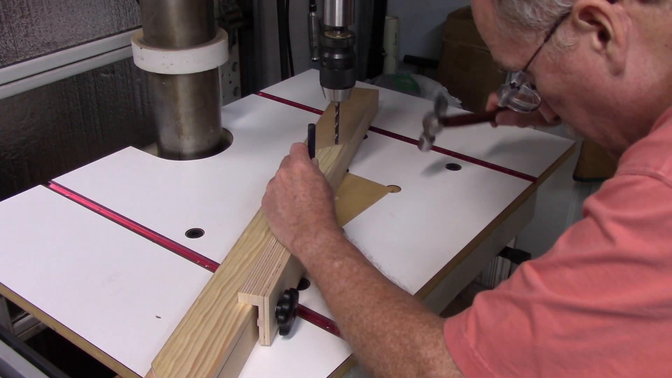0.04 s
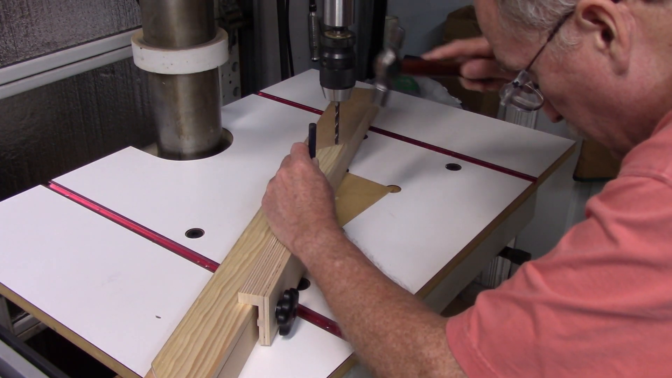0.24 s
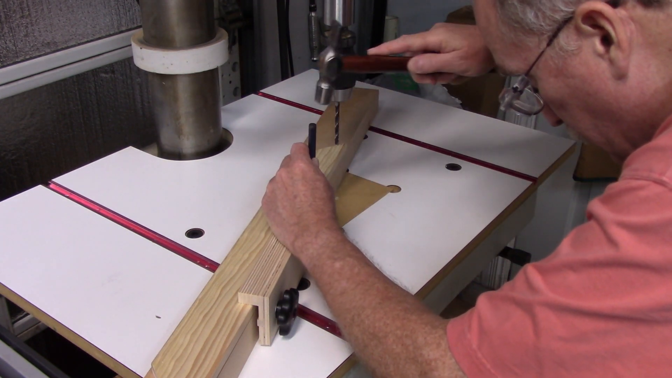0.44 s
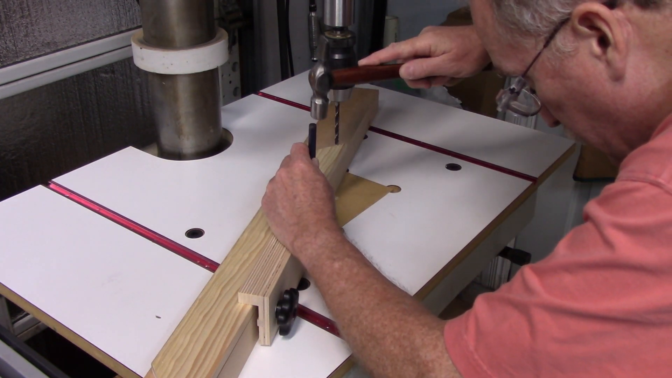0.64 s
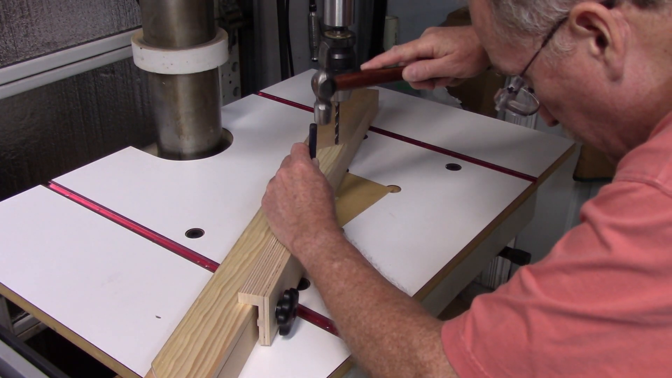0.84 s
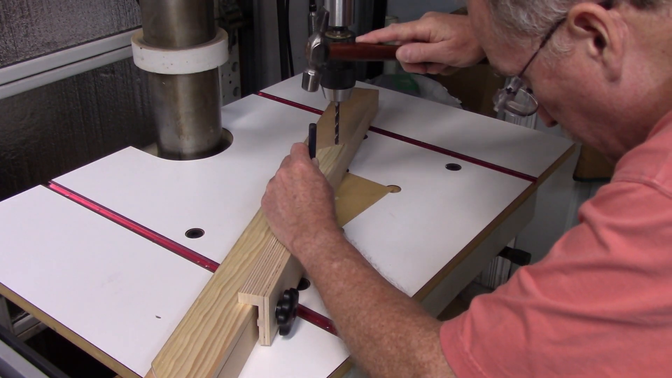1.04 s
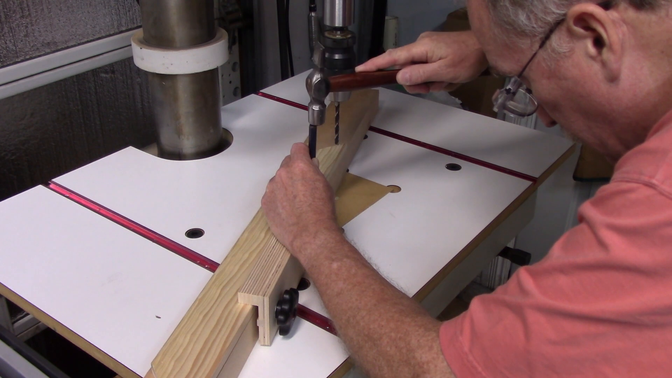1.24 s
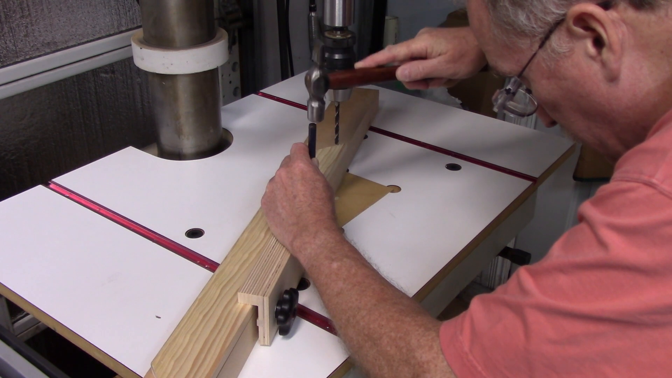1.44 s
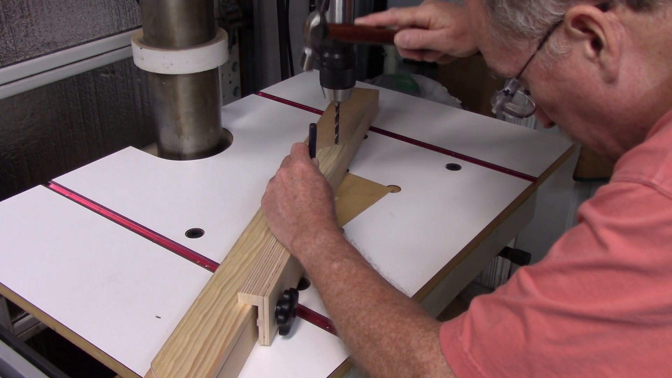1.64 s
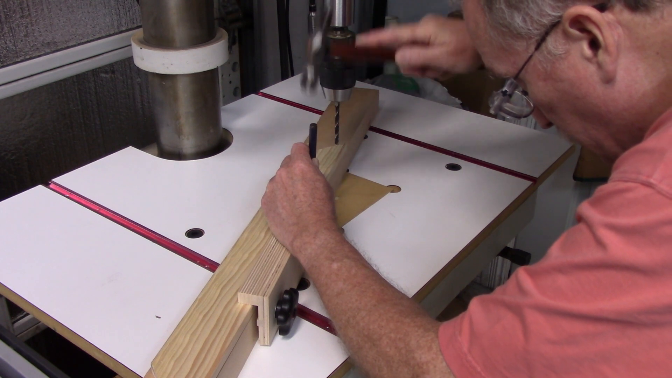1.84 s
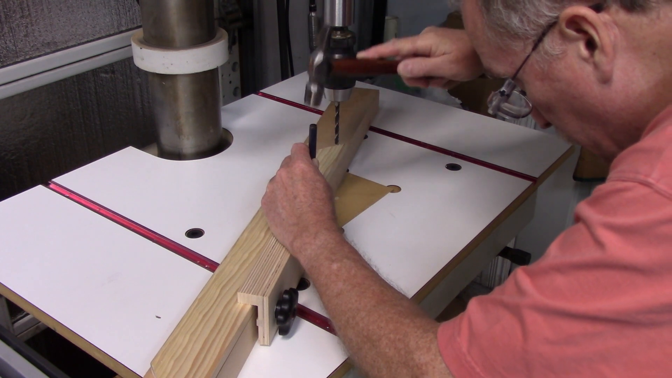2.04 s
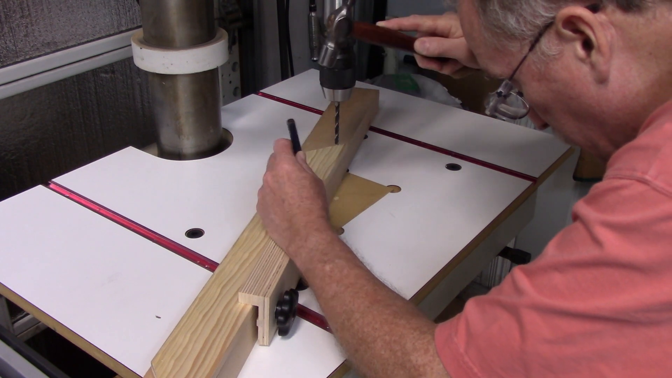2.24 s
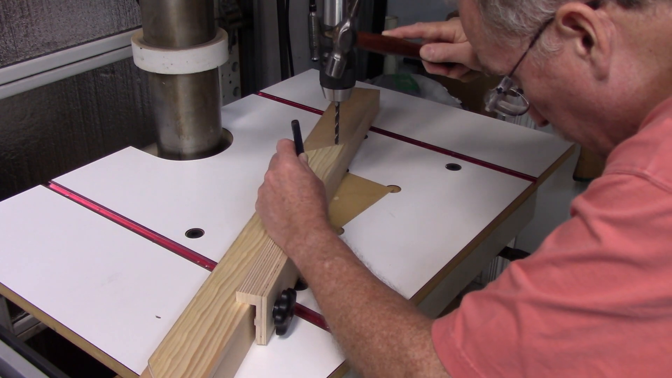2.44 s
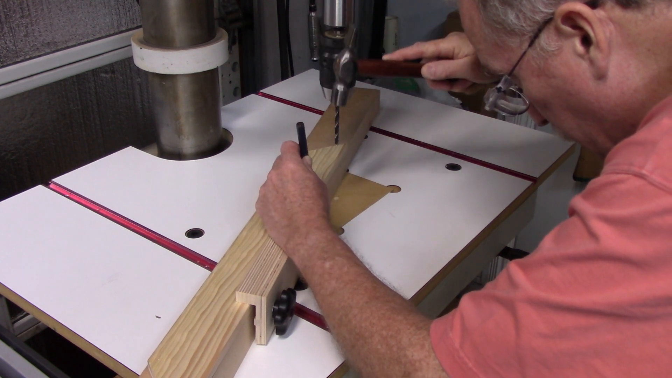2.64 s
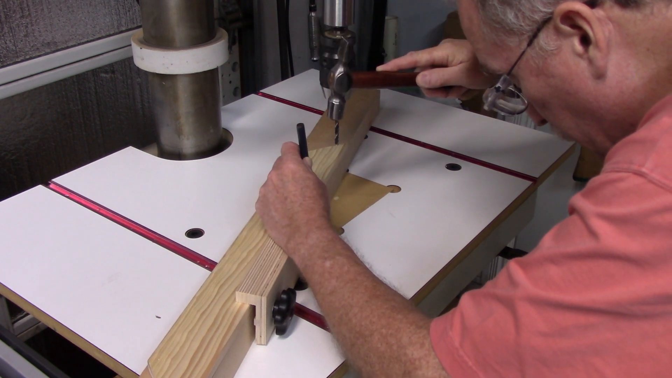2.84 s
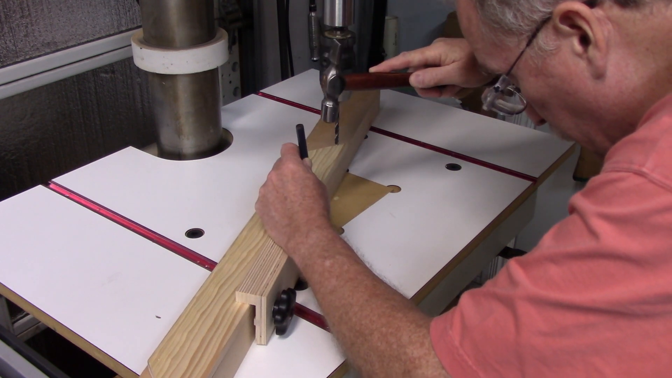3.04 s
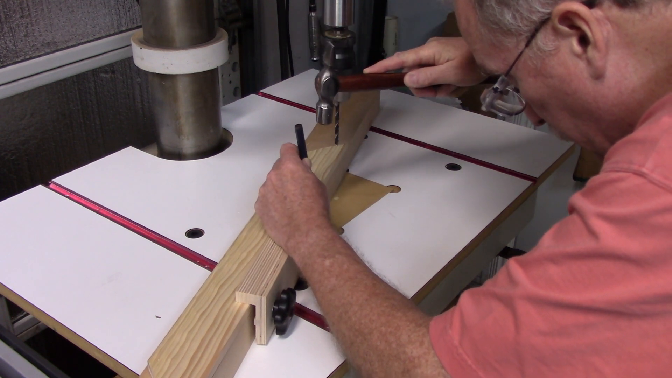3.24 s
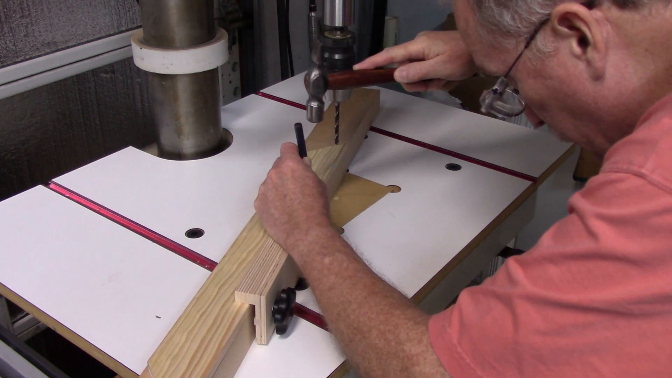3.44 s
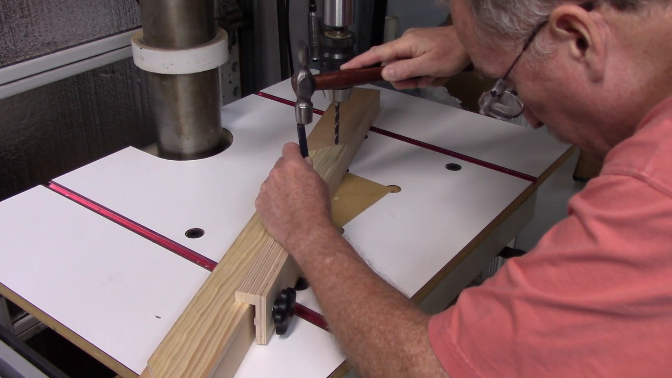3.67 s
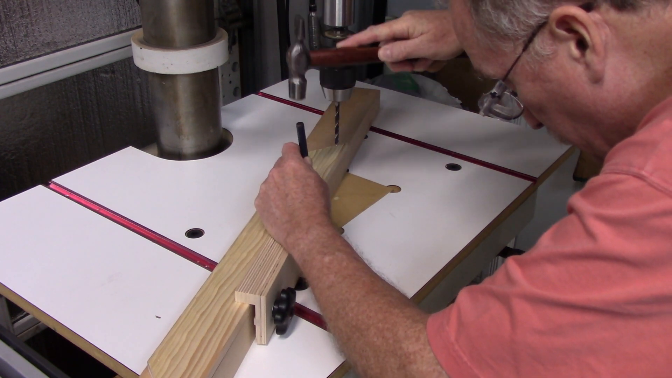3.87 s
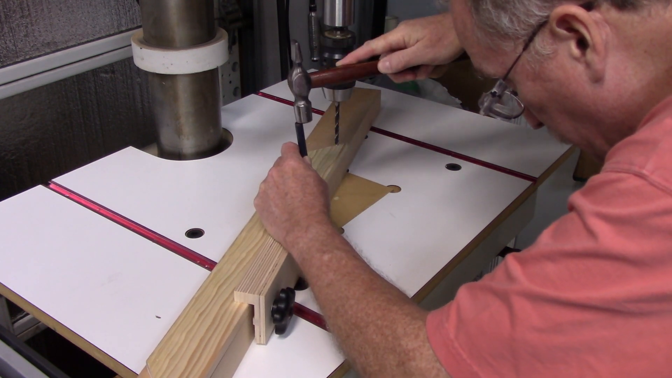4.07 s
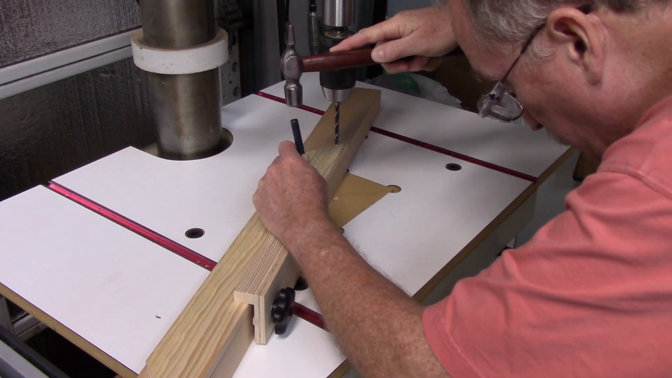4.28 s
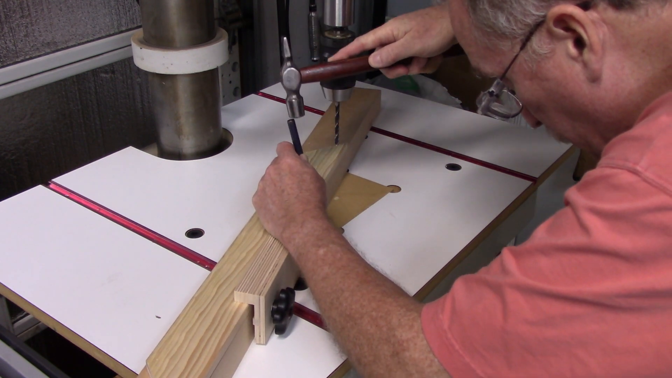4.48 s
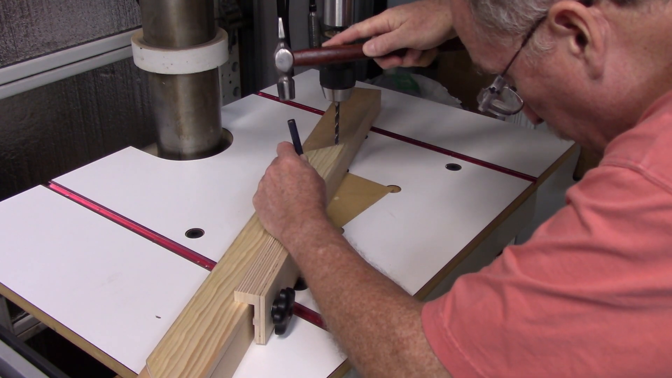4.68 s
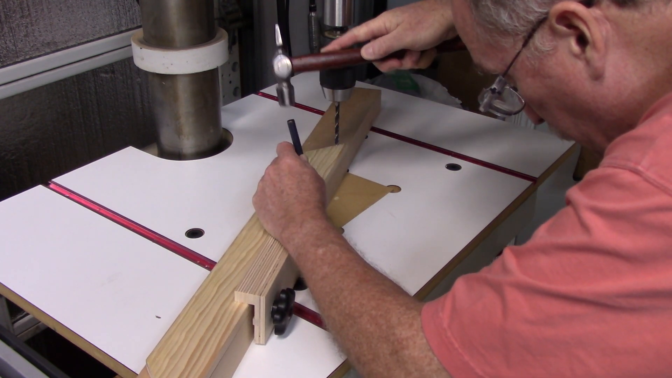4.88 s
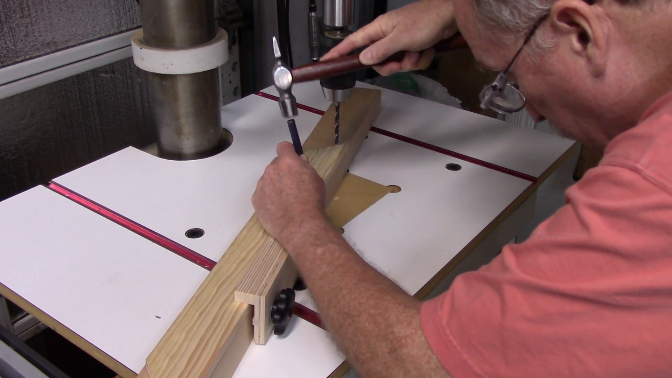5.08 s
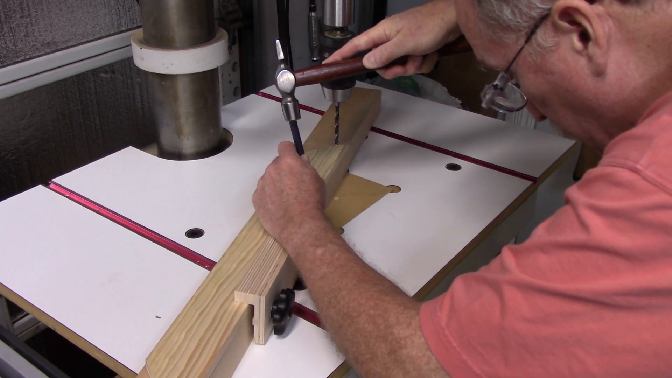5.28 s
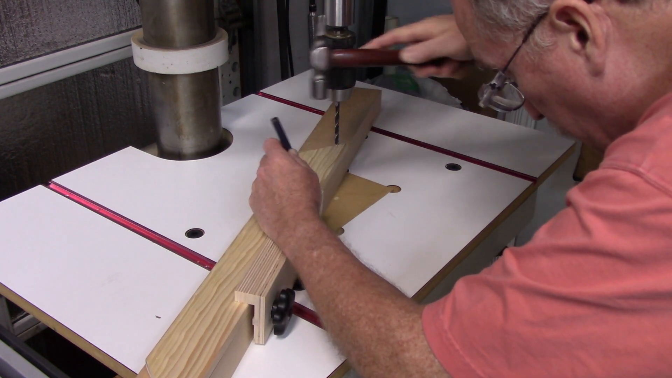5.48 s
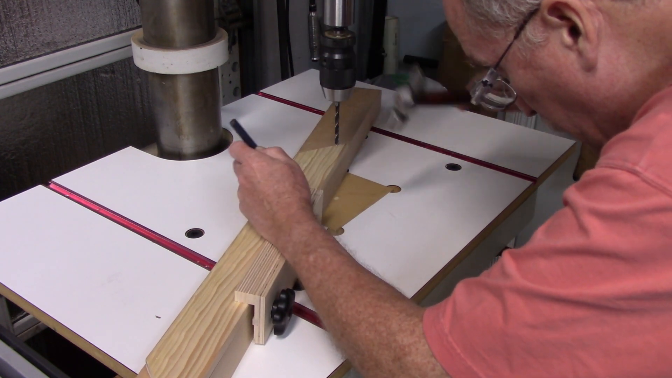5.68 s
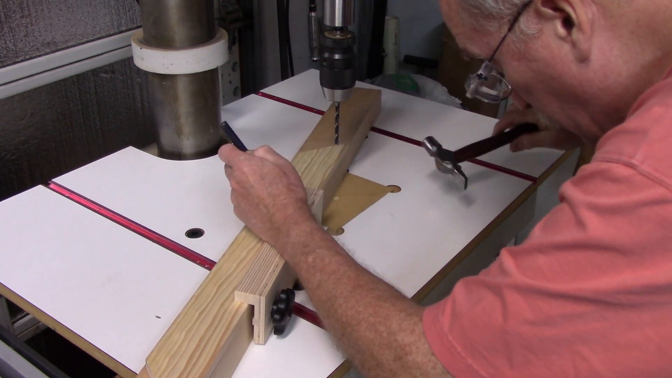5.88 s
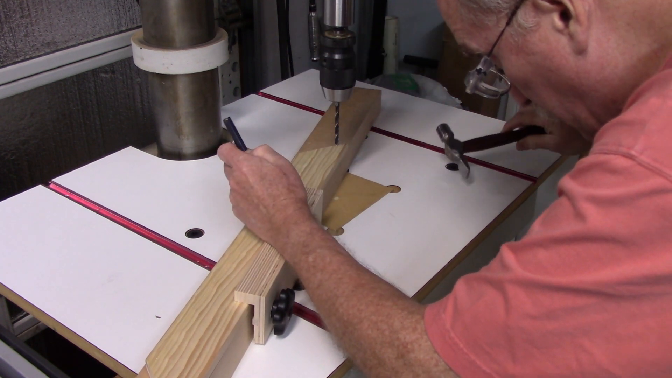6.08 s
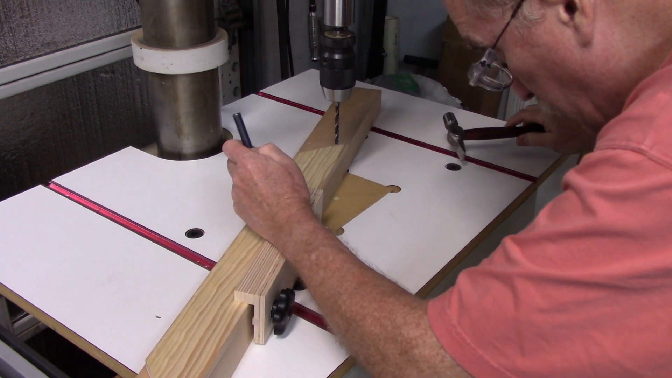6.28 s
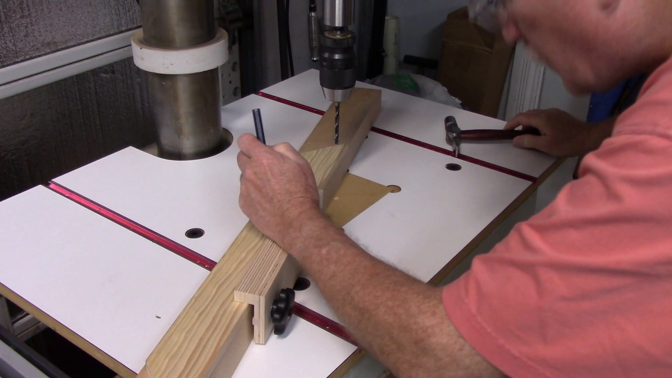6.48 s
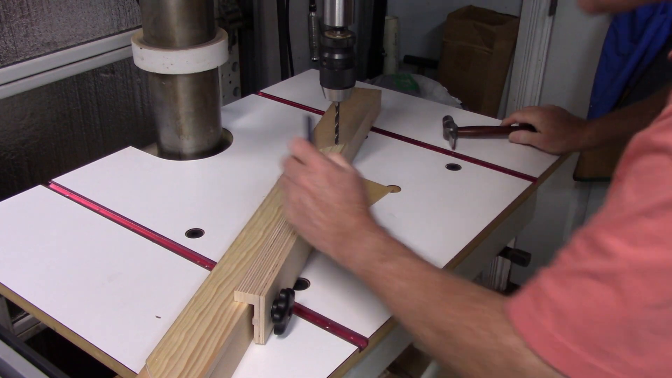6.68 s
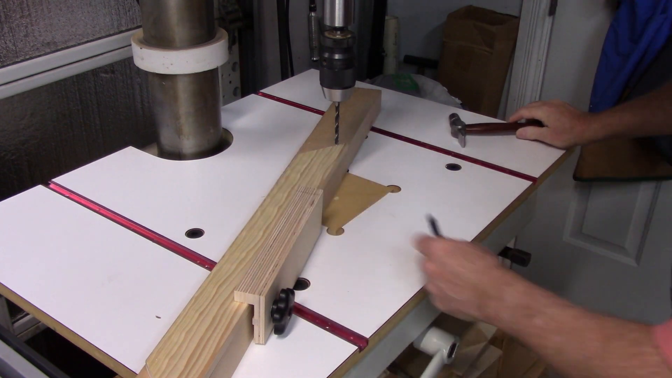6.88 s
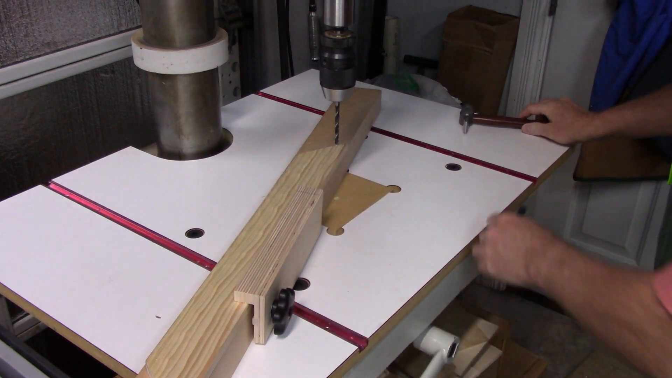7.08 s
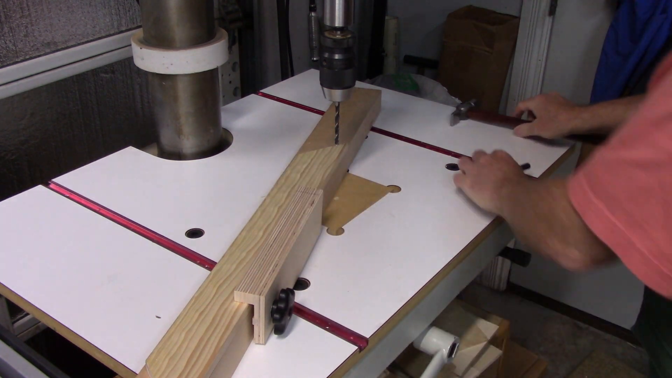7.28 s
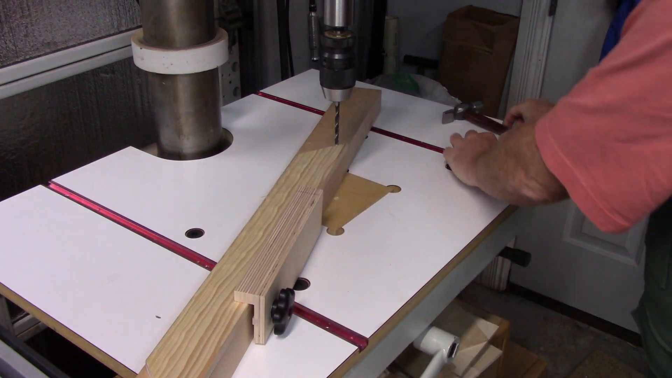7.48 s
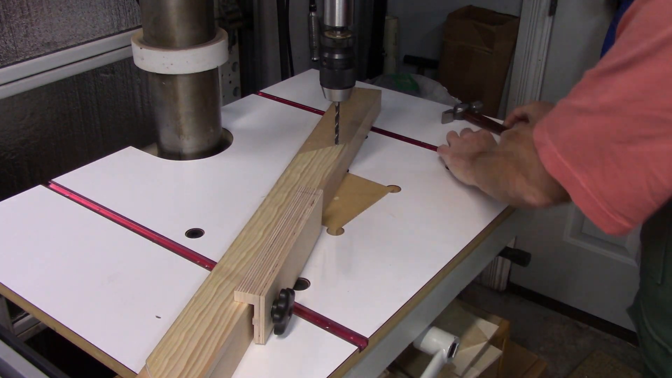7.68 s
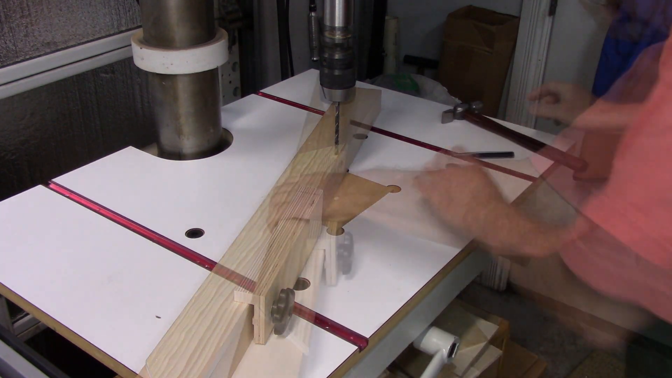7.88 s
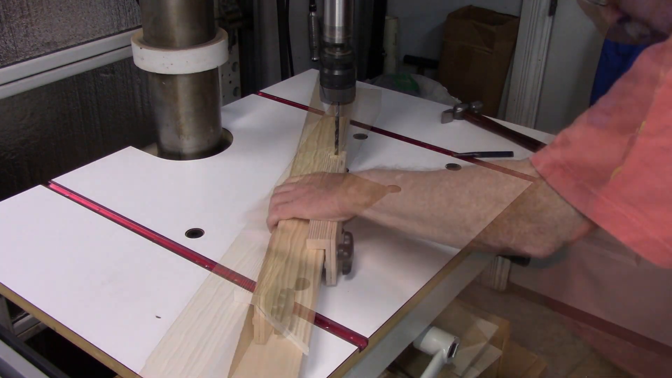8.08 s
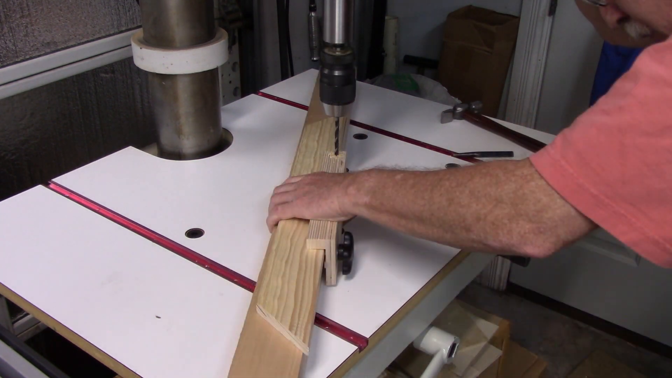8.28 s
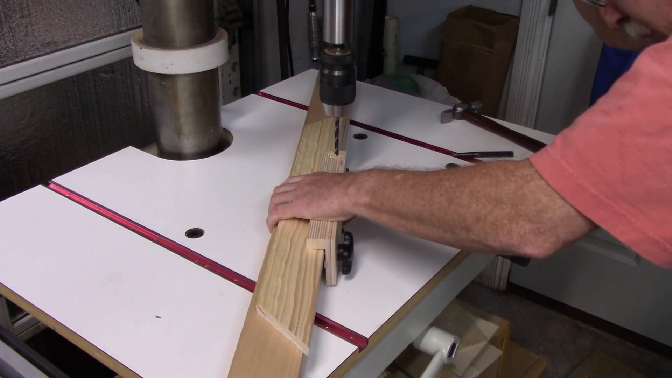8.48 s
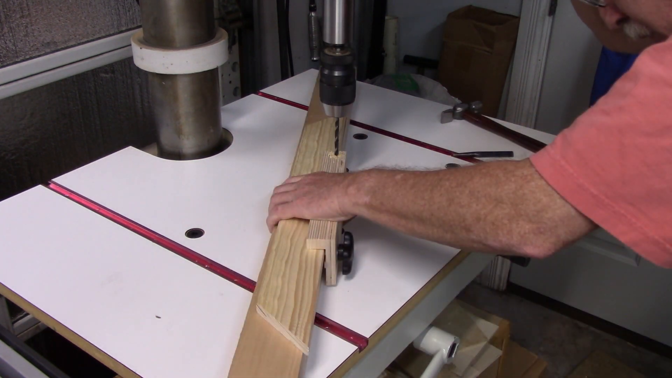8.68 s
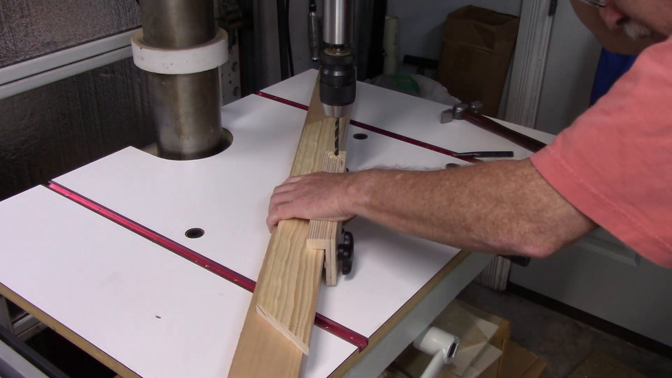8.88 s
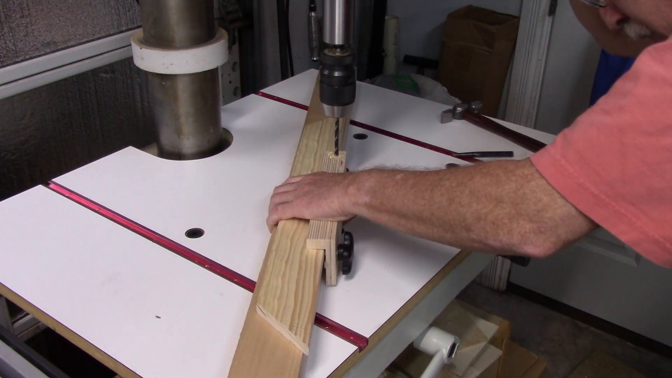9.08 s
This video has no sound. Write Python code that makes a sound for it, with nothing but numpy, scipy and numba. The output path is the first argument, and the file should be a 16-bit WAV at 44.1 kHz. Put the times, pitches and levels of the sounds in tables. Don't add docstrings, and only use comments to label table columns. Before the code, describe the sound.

A live workshop heard by a camera microphone, with quiet room air and a thin, high drive hiss and whine throughout. The faint echo of an earlier knock dies away at the start. A small hammer hits a steel punch on wood: weak and ringing at 0.8 s, medium at 1.3, strong at 2.0. After a pause come blows at 3.7, 4.1, a light one at 4.5, then 4.8, 5.1 and the hardest at 5.3, each a sharp crack with a roomy tail, briefly ducked. From 6.5 to 6.8 s tools knock and rock rapidly on a table top; soft thuds and a short drag follow around 7.1-7.4. From 7.7 the drill press fades in: irregular clacks until 7.9, a brief high squeal, then by 8.3 a full mid-low hum with bearing whine, surging near 8.5 and 9.0, with a late knock at 9.1, running to the end.

```python
import sys
import numpy as np
from scipy import signal
from scipy.fft import rfft, irfft, next_fast_len
from scipy.io import wavfile
from scipy.ndimage import map_coordinates
from numba import njit

SR = 44100
rng = np.random.default_rng(int(sys.argv[2]) if len(sys.argv) > 2 else 0)


def how_loud(loudness_db):
    steps = np.asarray(loudness_db, float) / 20
    return 10 ** steps


def waveform_to_disk(signal):
    frames = np.transpose(np.atleast_2d(signal))
    scaled = np.clip(frames, -1, 1) * 32767
    samples = np.round(scaled).astype(np.int16)
    wavfile.write(sys.argv[1], SR, samples)


N = 402191
T = np.arange(N) / SR

# start_s, blow_db, fence_bending_db, punch_ring_db, hammer_ring_db
TAPS = [
    (0.7864, -18, 9.5, 12.5, -15),
    (1.268, 0, -6.5, -1.5, -2.5),
    (1.9535, 12, -2.5, -0.5, -23),
    (3.705, -0.5, -4, -4.5, -3),
    (4.113, 9.5, -3.5, -7, -9),
    (4.457, -6, 4, -1, -33),
    (4.808, 9, -1, -4.5, -35),
    (5.063, 12, 1, -7, -9),
    (5.272, 15.5, -2, -11, -28),
]
REBOUNDS = [
    (.797, -35, 3, 0, -30),
    (1.291, -10.5, 1.5, -15, -30),
]
# lower_hz, upper_hz, width_hz
SEAT_TONES = [(2380, 5400, 170), (2930, 3520, 140), (1500, 5000, 300), (1190, 3440, 140), (2950, 5230, 220),
              (2920, 6250, 260), (2280, 2970, 300), (2980, 5450, 220), (3050, 5900, 450)]
# lower_db, upper_db
SEAT_LEVELS = [(8.5, 1), (-14, -1), (-9, -2.5), (-3.5, 1), (-11, -9), (3, -16), (-29, -6), (-3, -8),
               (-3.5, -12)]
# pitch_hz, width_hz, level_db
FENCE_BENDING = [(401, 390, -8.5), (763, 680, -6.5), (1068, 297, -2), (1444, 430, -2.5)]
# pitch_hz, width_hz, level_db
FENCE_EDGE = [(1874, 257, 4), (2308, 200, 1.5)]
# pitch_hz, width_hz, level_db
FENCE_KNOCK = [(2842, 177, 2), (3500, 710, -0.5), (4285, 660, -8.5), (8050, 800, -6), (9200, 2500, -14)]
# pitch_hz, width_hz, level_db
PUNCH_RING = [(4940, 150, -1.5), (5256, 240, -3.5), (5540, 370, -6), (6220, 200, -4.5), (7100, 200, -12)]
# pitch_hz, width_hz, level_db
PUNCH_BENDING = [(1400, 90, 1), (4190, 200, -6), (4930, 90, -4), (6255, 90, -6), (8550, 80, -11),
                 (11150, 250, -11)]
# pitch_hz, width_hz, level_db
HAMMER_RING = [(10100, 200, -24), (13017, 9, 3), (13790, 42, -22)]
PUNCH_BENDING_DB, FENCE_EDGE_DB = -4, -2
PUNCH_CHATTER_S = 0.03
NEAR_HZ = 756

# start_s, blow_db, hardness_khz, thud_db
KNOCKS = [(6.485, -6, 1.8, -9.5), (6.54, 2, 5, -15), (6.737, 0.5, 0.57, -3), (6.748, -11, .74, 4),
          (6.774, -34, 0.9, 2), (6.786, -5.5, 0.84, -1.5), (6.804, -12.5, 0.8, -13), (7.128, -13, 1.2, 3),
          (7.153, -18.5, .65, 10.5), (7.25, -22.5, 0.4, 11.5), (7.43, -16, 0.46, 4), (7.617, -34, 1, 15)]
# blow_db, hardness_khz, thud_db
EARLIER_KNOCK = (-2.7, 2.5, -2.5)
EARLIER_BY_S = 1 / 12
# pitch_hz, width_hz, level_db
TABLE_KNOCK = [(1062, 41, 7), (1373, 71, 3.5), (1532, 42, 5.5), (1650, 104, 4.5), (1914, 290, 2.5),
               (2790, 720, -0.5), (3820, 800, 1.5), (5650, 3800, 2), (7800, 7500, -1.5)]
# pitch_hz, width_hz, level_db
TABLE_THUD = [(369, 54, -2.5), (566.6, 38, 8), (703, 65, 8), (900, 97, 6.5)]
ROCK_S, ROCK_GAP_S = 6.568, 0.0222
ROCK_DB, ROCK_LOSS_DB = -8, 1.5
ROCK_HARDNESS_KHZ, ROCK_THUD_DB = 1.2, -3
CONTACT_S, CONTACT_GROWS, SHORTEST_S = 0.058, 0.36, 0.022
TABLE_ROOM_DB = -6
# attack_s, hold_s, release_s
DRAG = (.015, .175, .09)
# start_s, attack_s, hold_s, release_s
BRUSH = (6.82, .2, .25, .15)
DRAG_S, DRAG_DB, BRUSH_DB = 7.082, -25.5, -41.5

# start_s, blow_db, low_db
RATTLE = [
    (7.6871, -11, 5),
    (7.712, -14, 8),
    (7.7219, -18, 18),
    (7.7567, -10.5, 7.5),
    (7.8047, -6.5, 0.5),
    (7.8493, -10, 4),
    (7.888, -12, 4.5),
    (7.911, -12.5, 5),
    (8.03, -18, 11),
    (9.097, -16, 5),
]
# pitch_hz, width_hz, level_db
GUARD_LOW = [(695, 176, -9), (1050, 106, -2.5), (1704, 170, 1.5)]
# pitch_hz, width_hz, level_db
GUARD = [(3090, 550, 5), (3650, 480, 4), (5800, 690, -5), (6800, 420, -12)]
# attack_s, hold_s, release_s
SQUEAL = (.03, .12, .04)
# pitch_hz, level_db
BELT = [(4760, -0.5), (10950, -5)]
SQUEAL_S, SQUEAL_DB = 7.69, -36
# pitch_hz, width_hz, level_db
CASTING = [(244.2, 13.3, -8.5), (295, 20, -9), (353.4, 13.4, -0.5), (443.7, 14.5, -1), (527, 8.4, 3),
           (615, 29, -4), (689, 43, -9.5), (824, 56, -12)]
# pitch_hz, width_hz, level_db
COVER = [(990, 550, -13.5), (1252, 42, -6), (1390, 99, -11), (1567, 12, -4.5), (1623, 14, -6.5),
         (1857, 79, -9.5), (2040, 160, -16.5)]
# pitch_hz, width_hz, level_db
BEARING = [(2215, 98, -9.5), (2426, 31, 1), (2549, 52, -1), (2880, 170, -14), (3180, 41, -6),
           (3600, 400, -26), (4130, 85, -19), (4580, 140, -34), (6200, 1200, -24)]
CASTING_DB, COVER_DB, BEARING_DB = -12.5, -18, -19.5
COVER_EARLY, BEARING_EARLY = 1, 0.93
# middle_s, level_db
SHUDDERS = [
    (8.25, 1),
    (8.515, 5.5),
    (8.62, 0),
    (8.85, 2),
    (9.015, 5),
    (9.11, 3.5),
]
SHUDDER_S = 0.028
# pitch_hz, level_db (per Hz)
RUMBLE = [(25, -18), (60, -15.5), (200, -5.5), (300, -19)]
FADE_S, FADE_LENGTH_S = 7.67, 0.64

# pitch_hz, level_db (per Hz)
DRIVE = [(2940, -55), (5000, -28), (5950, -3.5), (7160, -10), (7510, -5), (8040, -2.5), (8280, 5),
         (8600, -1.5), (9480, -2.5), (10300, -5), (11100, -10), (12000, -5), (13300, -13), (14400, -2.5),
         (15900, -16)]
# pitch_hz, level_db (rms)
WHINE = [(963.6, -60), (3661, -68), (6132, -58), (6783, -61), (7564, -59), (7854, -57), (8043, -57),
         (8161, -55), (8280, -50), (8403, -55), (8581, -55), (8764, -56), (8882, -53), (8942, -51),
         (9060, -55), (9679, -58), (9895, -58), (11617, -63), (12516, -65), (12715, -64), (13264, -66),
         (13921, -67)]
# pitch_hz, level_db (per Hz)
AIR = [(15, -58), (25, -29), (209, -12.5), (228, -5), (267, -6.5), (466, -2.5), (521, -4), (596, -4.5),
       (871, -7), (996, -1.5), (1090, -9), (2430, -14), (5200, -13.5), (6760, -39), (11400, -120)]
DRIVE_DB, AIR_DB, FRAME_HZ = -30, -42.5, 60
# pitch_hz, decay_s
SHOP = [(200, 0.72), (1000, 0.8), (3000, 0.65), (6000, 0.76), (12000, 0.12)]
# pitch_hz, level_db
MIC = [(30, -3.5), (120, -11), (215, -7.5), (240, -2.5), (7000, -1), (12000, -4.5), (15700, -11),
       (16000, -41)]


def taps():
    out = np.zeros(N)
    rows = zip(TAPS + REBOUNDS, 2 * SEAT_TONES, 2 * SEAT_LEVELS)
    for (start, db, low_db, punch_db, head_db), (lower, upper, width), (lower_db, upper_db) in rows:
        wood = struck(FENCE_KNOCK, t60=0.028, hardness=7.8)
        wood += how_loud(low_db) * struck(FENCE_BENDING, t60=0.03, hardness=8.9)
        wood += how_loud(low_db + FENCE_EDGE_DB) * struck(FENCE_EDGE, t60=0.011, hardness=4.4)
        steel = how_loud(head_db - 3.5) * struck(HAMMER_RING, t60=0.004, hardness=19.0)
        steel -= how_loud(punch_db - 2.0) * struck(PUNCH_RING, t60=PUNCH_CHATTER_S, hardness=14)
        steel += how_loud(punch_db + PUNCH_BENDING_DB) * struck(PUNCH_BENDING, t60=0.004, hardness=4.7)
        seat = how_loud(lower_db) * struck([(lower, width, 0)], t60=0.0068, hardness=11.2)
        seat += how_loud(upper_db) * struck([(upper, width, 0)], t60=0.0068, hardness=11.2)
        direct, spread = how_loud(db) * (wood + steel + seat)
        direct = filtered(direct, lambda hz: (1j * hz / (1j * hz + NEAR_HZ)) ** 2)
        add(out, start, np.array([direct, spread]), room_db=-4.0)
    return out


def table():
    out = np.zeros(N)
    rocks = [(ROCK_S + k * ROCK_GAP_S, ROCK_DB - k * ROCK_LOSS_DB, ROCK_HARDNESS_KHZ, ROCK_THUD_DB)
             for k in range(6)]
    for start, db, hardness, thud_db in [(-EARLIER_BY_S, *EARLIER_KNOCK), *KNOCKS, *rocks]:
        contact = max(CONTACT_S * how_loud(CONTACT_GROWS * db), SHORTEST_S)
        blow = struck(TABLE_KNOCK, contact, hardness)
        blow -= how_loud(thud_db) * struck(TABLE_THUD, contact, hardness)
        add(out, start, how_loud(db + 1.0) * blow, TABLE_ROOM_DB)
    drag_body = [(hz, width, db - hz / 110) for hz, width, db in TABLE_THUD + TABLE_KNOCK]
    out += gains(DRAG_S, *DRAG, DRAG_DB) * shaken(drag_body, lumps_db=-1.0, rate=50)
    out += gains(*BRUSH, BRUSH_DB) * shaken(TABLE_KNOCK[:7], lumps_db=0.0, rate=15)
    return out


def drill():
    return drill_hum() + guard_rattle() + belt_squeal()


def drill_hum():
    share = fade()
    surge_db = sum(db * np.exp(-0.5 * ((T - middle) / SHUDDER_S) ** 2) for middle, db in SHUDDERS)
    casting = how_loud(CASTING_DB + surge_db) * share
    cover = how_loud(COVER_DB) * share ** COVER_EARLY
    bearing = how_loud(BEARING_DB) * share ** BEARING_EARLY
    out = casting * shaken(CASTING, lumps_db=2.5, rate=45)
    out += cover * shaken(COVER, lumps_db=0.0, rate=44)
    out += bearing * shaken(BEARING, lumps_db=1.0, rate=70)
    out += how_loud(-12.5) * casting * noise(RUMBLE)
    return filtered(out, lambda hz: 1 / (1 + (hz / 7000) ** 4))


def guard_rattle():
    out = np.zeros(N)
    for start, db, low_db in RATTLE:
        blow = struck(GUARD, t60=0.066, hardness=28)
        blow += how_loud(low_db) * struck(GUARD_LOW, t60=0.072, hardness=2.8)
        add(out, start, how_loud(db - 5.0) * blow, room_db=-9)
    return out


def belt_squeal():
    squeal = np.zeros(N)
    for hz, db in BELT:
        squeal += how_loud(db + 1.5 * wobble(60)) * np.sin(2 * np.pi * hz * T + 0.43 * wobble(80))
    return gains(SQUEAL_S, *SQUEAL, SQUEAL_DB) * squeal


def camera():
    throb = 1 + 0.1 * np.sin(2 * np.pi * 2 * FRAME_HZ * T) + 0.043 * np.sin(2 * np.pi * FRAME_HZ * T)
    out = how_loud(DRIVE_DB - 1.02 + 1.3 * wobble(3.63)) * throb * noise(DRIVE)
    for hz, db in WHINE:
        out += how_loud(db + 5 + 2.5 * wobble(8)) * np.sin(2 * np.pi * hz * T + 0.7 * wobble(12))
    return out


def room_air():
    return how_loud(AIR_DB + 0.13 * wobble(4.68)) * noise(AIR)


def struck(body, t60, hardness):
    t = T[:SR // 2]
    decay = how_loud(-60 * t / max(t60, 1 / 200))
    chatter = decay * (1 - np.exp(-t / 0.000045)) * rng.standard_normal(len(t))
    chatter[:2] += 5
    click = 1.0 * (t == 0)

    def soft(hz):
        return (1j * hz / (1j * hz + 300)) ** 2 / (1 + 1j * hz / (1000 * hardness)) ** 3

    rows = np.array([resonant(filtered(force, soft), body) for force in (chatter, click)])
    return 7 * rows / np.linalg.norm(rows, axis=1)[:, None]


def shaken(body, lumps_db, rate):
    return unit(resonant(rng.standard_normal(N) * how_loud(lumps_db * wobble(rate)), body))


def resonant(force, body):
    def response(f):
        total = 0
        for k, (hz, width, db) in enumerate(body):
            total = total + (-1) ** k * how_loud(db) * 1j * f * width / (hz * hz - f * f + 1j * f * width)
        return total

    return filtered(force, response)


def add(out, start, blow, room_db):
    hz, t, z = signal.stft(rng.standard_normal(SR), SR, nperseg=256)
    z = z * how_loud(-60 * t / along(SHOP, hz)[:, None])
    tail = signal.istft(z, SR, nperseg=256)[1][:SR]
    t = T[:len(tail)]
    tail *= (1 - np.exp(-t / 0.0067)) * (1 + 3.53 * np.exp(-t / 0.011))
    direct, spread = blow
    sound = how_loud(room_db) * signal.fftconvolve(spread, tail / np.linalg.norm(tail))
    sound[:len(direct)] += direct
    i = round(start * SR)
    sound = sound[max(-i, 0):][:N - max(i, 0)]
    out[max(i, 0):][:len(sound)] += sound


def noise(spectrum):
    return unit(filtered(rng.standard_normal(N), lambda hz: how_loud(along(spectrum, hz))))


def gains(start, attack, hold, release, db):
    corners = start + np.cumsum([0, attack, hold, release])
    return how_loud(np.interp(T, corners, db - np.array([30, 0, 0, 30]), -120, -120))


def wobble(rate):
    return map_coordinates(rng.standard_normal(int(N * rate / SR) + 4), [T * rate])


def filtered(x, response):
    m = next_fast_len(len(x) + SR // 2)
    return irfft(rfft(x, m) * response(np.fft.rfftfreq(m, 1 / SR)), m)[:len(x)]


def along(points, hz):
    f, v = np.transpose(points)
    return np.interp(np.log(hz + 1), np.log(f + 1), v)


def unit(x):
    return x / np.sqrt(np.mean(x ** 2) + 1e-20)


def fade():
    return np.clip((T - FADE_S) / FADE_LENGTH_S, 0, 1)


def scene():
    events = np.tile(taps() + table() + drill(), (2, 1))
    background = room_air() + camera()
    return events + background * np.hypot(fade(), 1 - fade())


@njit
def follower(size, rise, fall):
    out, level = np.empty_like(size), 0.0
    for i in range(len(size)):
        level += (size[i] - level) * (rise if size[i] > level else fall)
        out[i] = level
    return out


def band_limit(x):
    return signal.sosfilt(signal.butter(12, 16070, fs=SR, output="sos"), x)


def record(dry):
    level = follower(np.abs(dry[0]), 1 / (0.00067 * SR), 1 / (0.026 * SR))
    late = np.pad(level, (round(0.004 * SR), 0))[:N]
    duck = 1 / np.maximum(1, late / how_loud(-0.5))
    x = dry[0] * duck
    cut = x / (1 + np.abs(x) ** 4) ** (1 / 4) - x
    x = 0.94 * (x + filtered(cut, lambda hz: (1j * hz / (1j * hz + 200)) ** 2))
    x += how_loud(-29) * late * duck * noise(RUMBLE)
    x = np.clip(filtered(x, lambda hz: how_loud(along(MIC, hz))), -1, 1)
    x = filtered(x, lambda hz: hz < 16100)
    mix = np.tile(x, (2, 1))
    return band_limit(mix)


dry = scene()
out = record(dry)
waveform_to_disk(out)
```